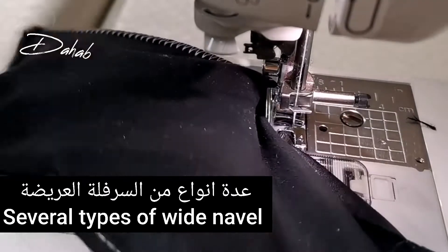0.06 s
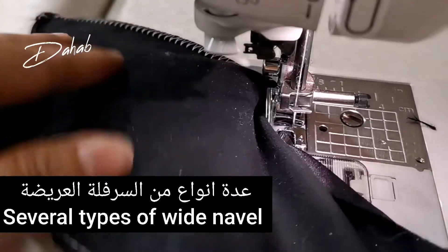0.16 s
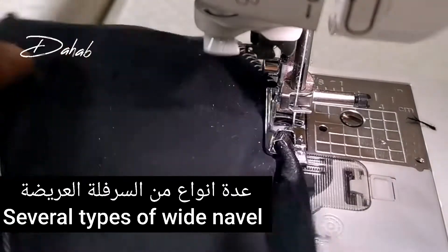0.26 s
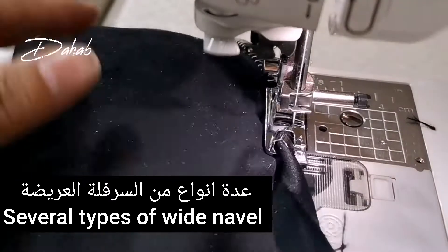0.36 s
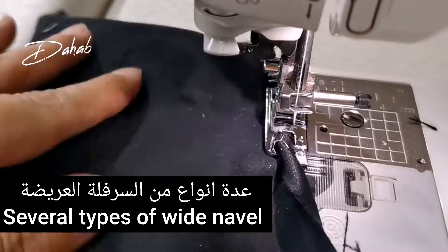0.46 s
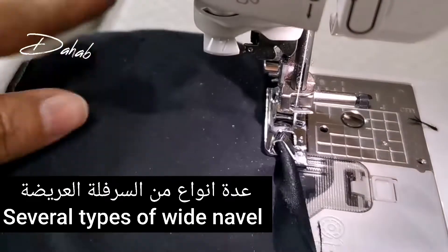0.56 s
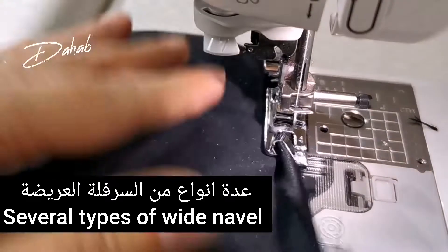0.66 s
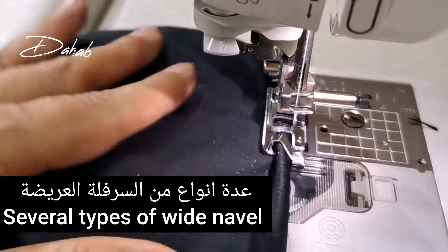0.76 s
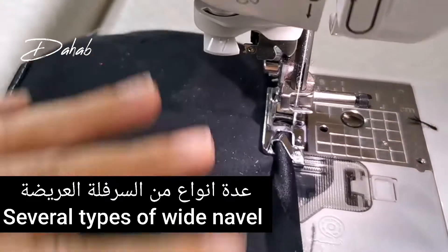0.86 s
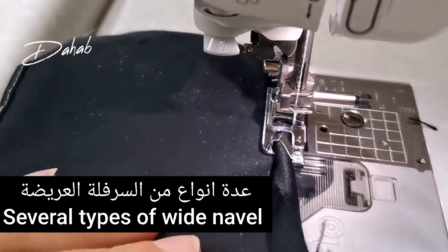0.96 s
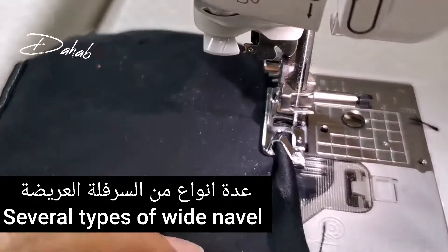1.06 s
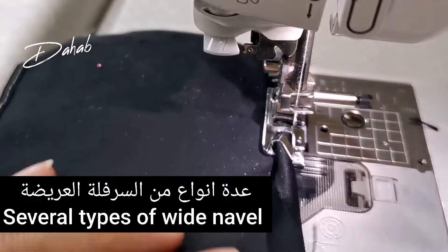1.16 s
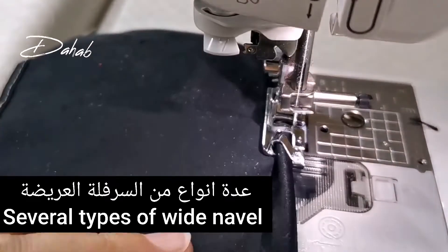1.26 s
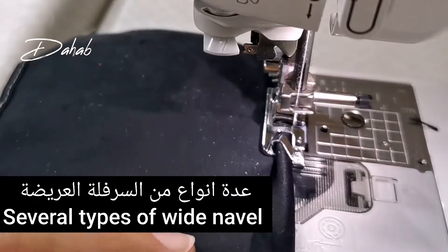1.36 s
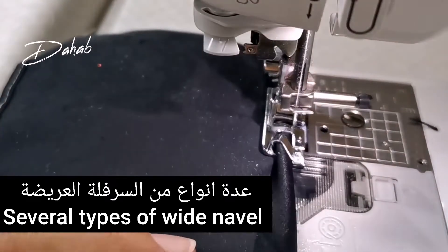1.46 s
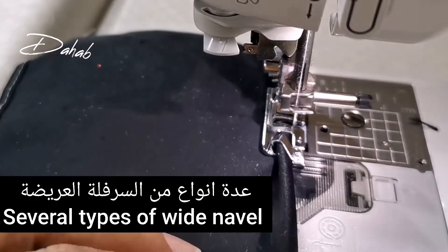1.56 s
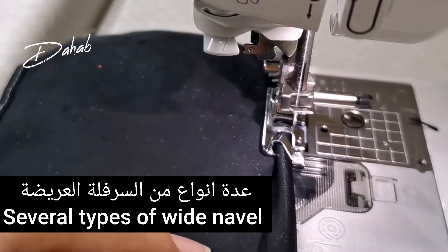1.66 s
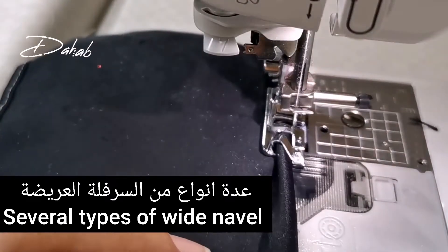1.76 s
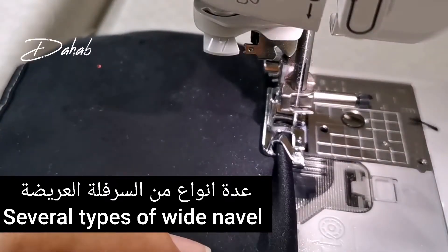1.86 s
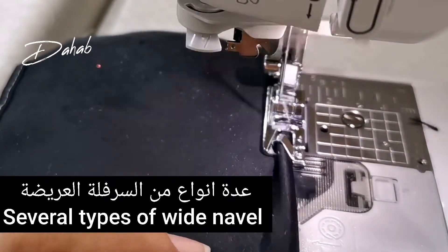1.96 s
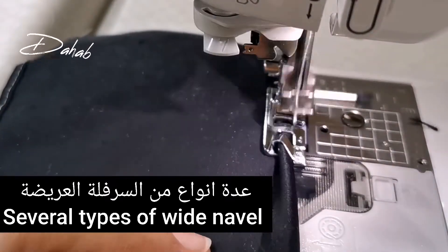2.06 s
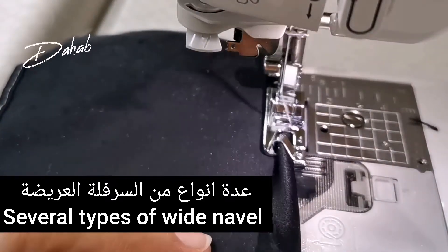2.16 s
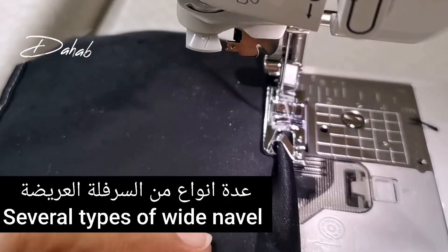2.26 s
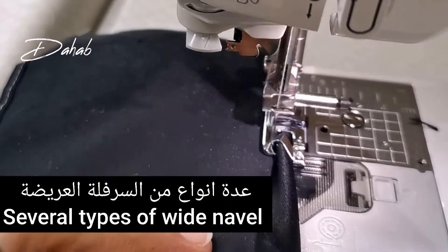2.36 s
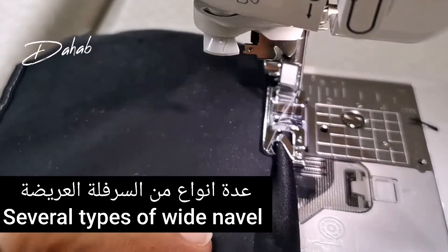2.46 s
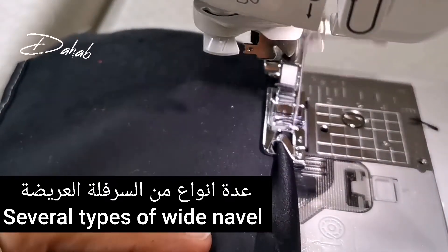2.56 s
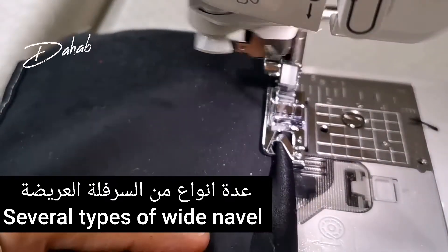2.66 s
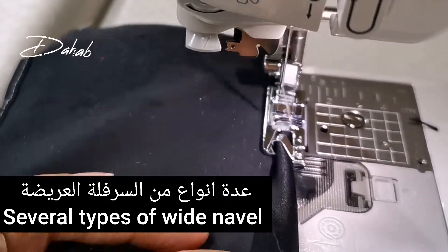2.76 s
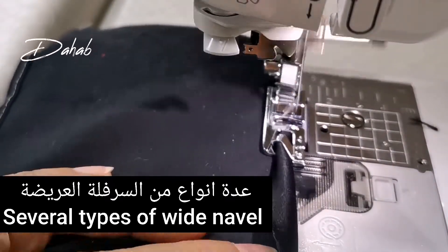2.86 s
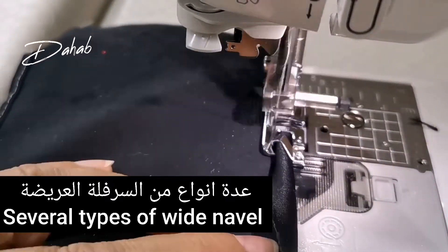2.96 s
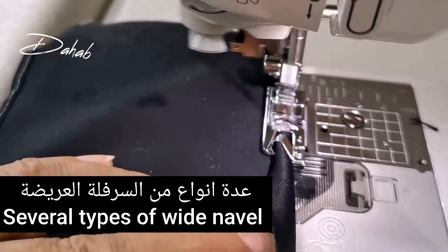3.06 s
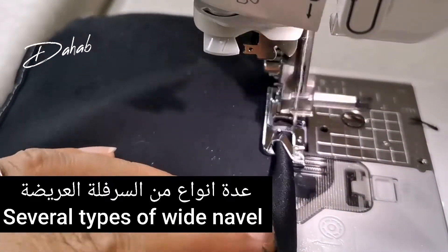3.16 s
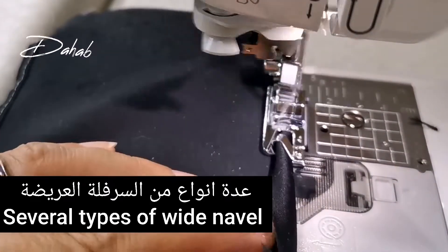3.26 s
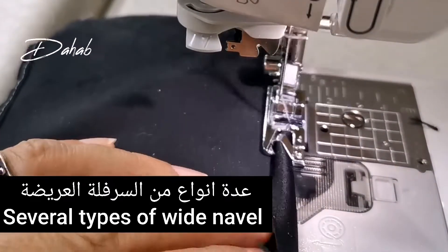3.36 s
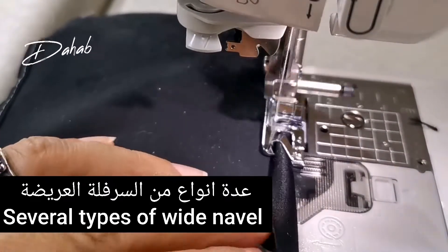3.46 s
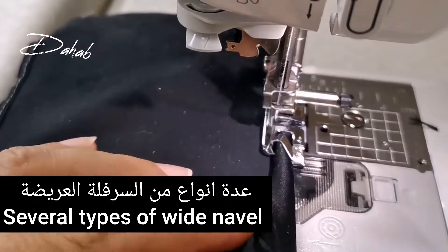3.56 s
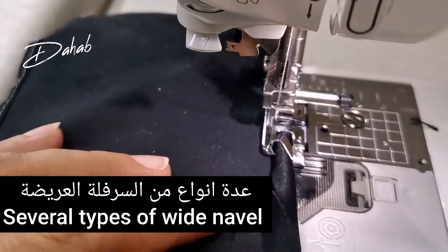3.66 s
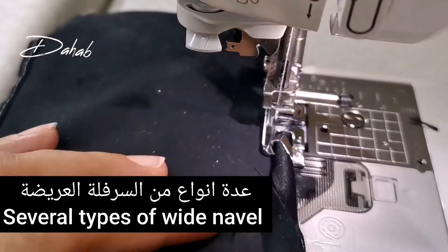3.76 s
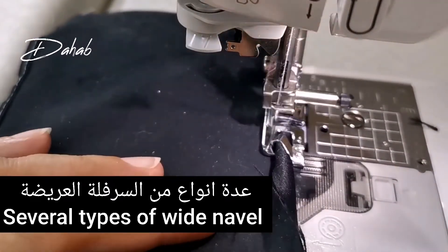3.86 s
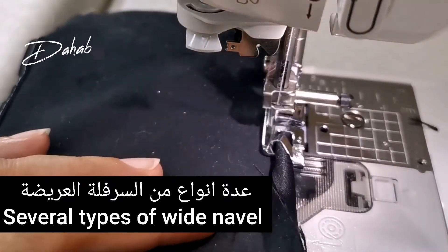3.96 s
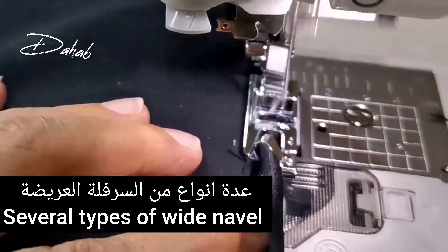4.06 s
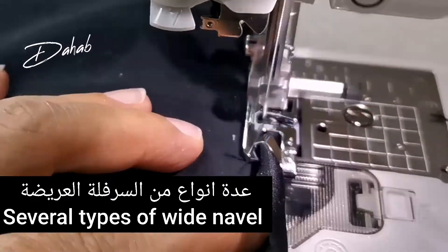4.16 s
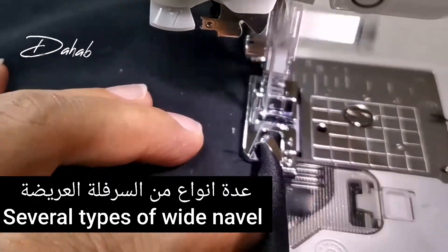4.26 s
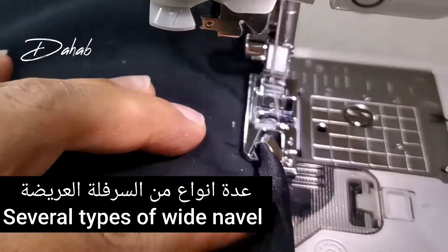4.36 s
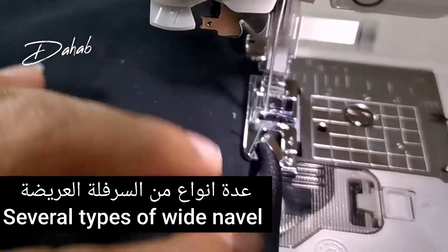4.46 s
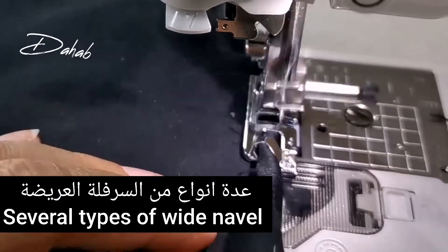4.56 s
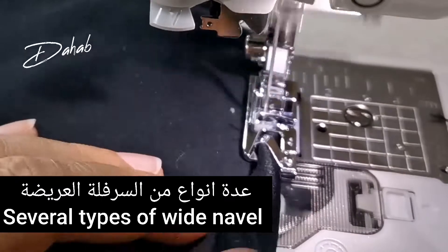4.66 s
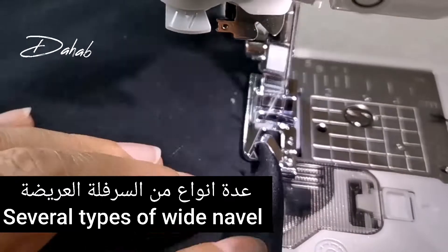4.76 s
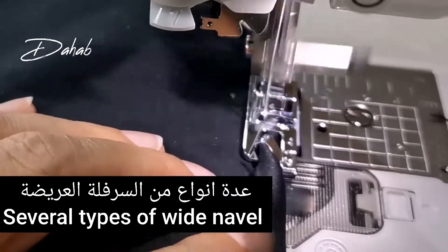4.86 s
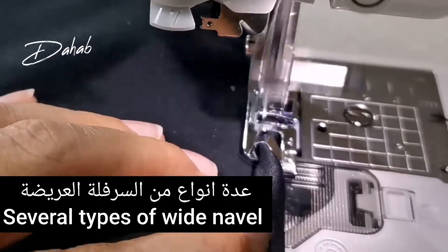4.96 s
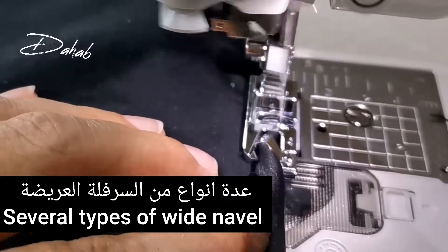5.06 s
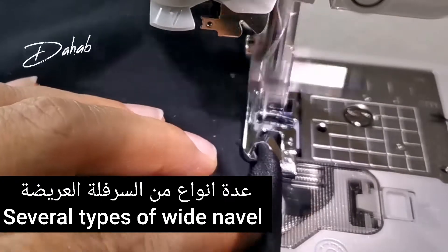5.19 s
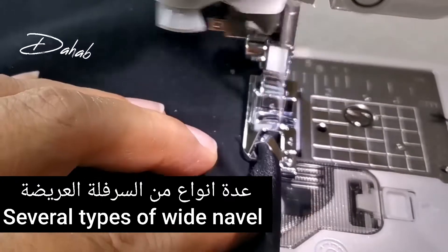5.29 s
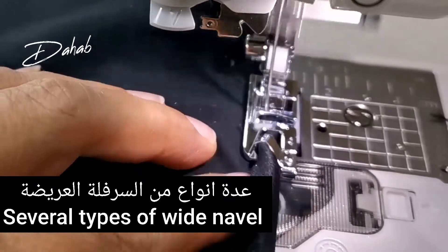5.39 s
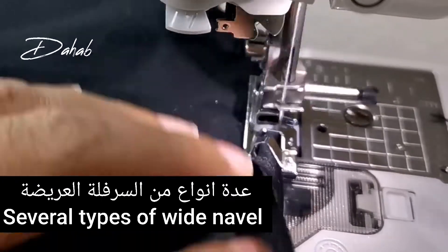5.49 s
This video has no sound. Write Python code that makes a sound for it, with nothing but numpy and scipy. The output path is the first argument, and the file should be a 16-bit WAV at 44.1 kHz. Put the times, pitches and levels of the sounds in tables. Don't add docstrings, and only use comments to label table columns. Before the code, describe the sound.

Cloth rustles and muffled fingertip thuds come first over faint room noise. An electric sewing machine then stutters into motion, its hollow casing knocking, metal links rattling and a belt whine climbing. It stops briefly, leaving near silence, and restarts at once at full speed with heavier table thumps and a constant mid-pitched hum, heard close in dry stereo.

```python
import sys
import numpy as np
from scipy import signal
from scipy.fft import rfft, irfft, next_fast_len
from scipy.io import wavfile
from scipy.ndimage import uniform_filter1d

SR = 44100
rng = np.random.default_rng(int(sys.argv[2]) if len(sys.argv) > 2 else 0)


def master_out(mix):
    frames = np.transpose(np.atleast_2d(mix))
    ceiling = np.clip(frames, -1, 1)
    pcm = np.round(ceiling * 32767).astype(np.int16)
    wavfile.write(sys.argv[1], SR, pcm)


def volts(x):
    e = np.asarray(x, float) / 20
    return 10 ** e


N = 243873
TIME = np.arange(N) / SR
BLOW_TIME = TIME[:SR // 6]
PADDED = next_fast_len(N)

# (frequency [Hz], density [dB per Hz])
ROOM_SPECTRUM = [(12, -36), (20, 2.5), (80, -10), (120, -14), (270, -12), (301, -19), (328, -9.5),
                 (388, -20), (558, -19.5), (1760, -25.5), (16000, -41)]
ROOM_DB = -65.5

# (time of top [s], rustle level [dB], time to rise 20 dB [s], time to fall 20 dB [s])
STROKES = [(.06, -62, .4, .2), (.33, -51.5, .1, .03), (.4, -70, .2, .08), (.5, -66, .05, .1),
           (.564, -52.5, .06, .19), (.754, -51.5, .03, .09), (.875, -65, .3, .06), (1.062, -63, .05, .04),
           (1.0, -69, .15, .4), (1.25, -66, .5, .12), (1.41, -68, .12, .3), (1.53, -65, .1, .12),
           (1.715, -65, .2, .025), (1.88, -64, .05, .08), (3.5, -71, .05, .2), (3.655, -64, .2, .12)]
# (frequency [Hz], density [dB per Hz])
RUSTLE_SPECTRUM = [(530, -21), (900, -9.5), (2250, -13.5), (2830, -7.5), (3470, -16.5), (4630, -6),
                   (6330, -14), (8150, -10), (13700, -19), (16000, -11.5)]
# (frequency [Hz], density [dB per Hz])
RUB_SPECTRUM = [(53, -41), (90, -15), (183, -7), (405, -16.5), (480, -17.5), (714, -15), (1600, -24),
                (2080, -38), (3520, -120)]
RESTING_RUSTLE_DB, RESTING_RUB_DB, RUB_OVER_RUSTLE_DB = -83, -67, -6

# (time [s], peak level [dB], long-ringing pitch [Hz], short pitch [Hz], crack level [dB])
TAPS = [(.098, -58, 340, 179, -14), (.238, -34.5, 382, 520, -25), (.512, -33.5, 290, 808, -25.5),
        (.7525, -27, 470, 745, -15), (.743, -52, 450, 900, -10), (1.05, -57, 146, 150, -24),
        (1.539, -53, 1130, 183, -20), (1.72, -57, 200, 990, -18), (1.981, -39, 438, 430, -24),
        (1.648, -70, 2100, 900, -8), (1.683, -70, 1900, 600, -10), (1.752, -62, 710, 720, -30),
        (1.864, -64, 700, 300, -14), (.555, -54, 420, 900, -16), (.29, -56, 400, 520, -20)]
SHORT_PARTIAL_DB = 3.5

# (time [s], peak level [dB])
SNAPS = [(0.1024, -54), (0.4529, -58), (0.7074, -53), (1.6929, -56), (1.8711, -55), (2.2578, -42),
         (3.1694, -39), (4.1474, -44), (4.1954, -35), (4.3794, -34), (4.8539, -30)]

# (frequency [Hz], width [Hz], level [dB])
SQUEAK_MODES = [(4900, 200, 0), (5500, 250, -8), (2700, 200, -10)]
SQUEAK_S, SQUEAK_LENGTH_S, SQUEAK_DB = 1.046, .03, -59

# (time [s], level [dB])
CREAK = [
    (1.188, -60),
    (1.197, -48),
    (1.215, -50),
    (1.25, -52),
    (1.26, -62),
]
# (frequency [Hz], width [Hz], level [dB])
CREAK_MODES = [(590, 146, -11), (720, 20, 2), (835, 24, -2), (1160, 30, -19), (2700, 80, -24),
               (335, 30, -17)]
POP_S, POP_DB, POP_HZ = 1.198, -37, 720

# (time [s], peak level [dB], level of ring near 7 kHz [dB])
TICKS = [(1.721, -51.5, -18), (1.9063, -40.5, -15), (1.9852, -30, -7.5), (2.2578, -43, -11),
         (2.322, -36, -13), (2.358, -32, -15), (2.363, -56, -7), (2.555, -32, -21), (2.616, -29, -3.5),
         (2.672, -29, -15), (2.73, -42, -11), (2.9604, -39, 3.5), (3.103, -26, -3), (3.4955, -52, -7),
         (3.933, -48.5, -30), (4.0696, -24.5, -17), (4.2284, -30, -27), (4.3106, -26.5, -27),
         (4.403, -28, -12.5), (4.7765, -30, -11), (4.8748, -27, -6), (5.1183, -27, -7), (5.3468, -26, -1),
         (5.486, -29, -9)]

# (time [s], level [dB])
EFFORT = [(1.978, -70), (1.995, -43), (2.11, -39), (2.17, -55), (2.22, -43), (2.28, -60), (2.34, -53),
          (2.45, -49.5), (2.7, -44), (3.2, -39.5), (3.4, -41), (3.47, -51), (3.62, -74), (3.7, -100),
          (4.022, -100), (4.035, -44), (4.6, -41), (5.53, -43)]
# (frequency [Hz], width [Hz], level [dB])
CASING_MODES = [(107, 58, -20.5), (186, 111, -8.5), (285, 82, -4.5), (460, 116, -5.5), (700, 123, -2.5),
                (770, 111.6, -0.5), (990, 110, -8), (1097, 402, -15.5)]
# (frequency [Hz], width [Hz], level [dB])
PLATE_MODES = [(1200, 830, -14.5), (1590, 105, -5), (2060, 490, -10), (2752, 130, 3), (2962, 355, -2),
               (3540, 110, -4.5), (3964, 155, -5.5), (4340, 180, -9), (4500, 85, -3), (4854, 287, -3),
               (5420, 390, -10)]
# (frequency [Hz], width [Hz], level [dB])
BAR_MODES = [(7256, 167, 2), (6910, 880, -6.5), (7750, 380, -4), (8460, 600, -6.5), (10600, 2100, -15),
             (13000, 1200, -13), (14560, 1100, -13.5)]
FULL_DB, HISS_DB, HISS_FOLLOWS = -41, -52, 1.1
STOP_S, RESTART_S, STOPPED_HISS_DB = 3.44, 4.0, -14

# (time [s], knock level [dB], knock pitch [Hz], rattle level [dB], rebound level [dB])
FIRST_SPELL = [(1.992, -50, 763, -50, -44), (2.034, -30.5, 693, -28, -55), (2.095, -28.5, 693, -31, -60),
               (2.205, -58, 740, -48, -62), (2.267, -58, 740, -44, -56), (2.318, -52, 732, -50, -56),
               (2.435, -50, 715, -50, -56), (2.523, -33, 694, -33, -46), (2.608, -47, 667, -45, -55),
               (2.646, -29, 695, -36, -37), (2.738, -28, 740, -30.5, -41), (2.821, -28.5, 743, -34, -36),
               (2.926, -29.5, 750, -30.5, -55), (2.994, -33, 690, -31, -43), (3.07, -30, 742, -28.5, -52),
               (3.1425, -29, 713, -29.5, -57), (3.2, -33, 780, -38, -36), (3.268, -29.5, 727, -37, -33),
               (3.337, -35, 764, -32, -52), (3.397, -26, 705, -37, -43), (3.462, -40, 700, -62, -70)]
# (time [s], knock level [dB], knock pitch [Hz], rattle level [dB], rebound level [dB])
SECOND_SPELL = [(4.04, -47, 654, -35.5, -40), (4.118, -53, 694, -40, -36), (4.201, -27.5, 745, -34.5, -40),
                (4.29, -47, 815, -33, -44), (4.365, -41, 737, -37, -37), (4.446, -35, 695, -34.5, -41),
                (4.525, -32.5, 778, -29.5, -50), (4.606, -35, 799, -32, -32), (4.685, -31, 770, -28, -50),
                (4.759, -40, 753, -31.5, -38), (4.831, -48, 685, -36.5, -40.5),
                (4.916, -28, 705, -29.5, -58), (5.0, -32, 700, -29.5, -50), (5.073, -35, 685, -33, -50),
                (5.153, -37, 770, -34, -42), (5.239, -34.5, 748, -33, -50), (5.308, -48, 804, -33, -58),
                (5.388, -24, 734, -31.5, -50), (5.463, -35, 770, -32.5, -37)]
RATTLE_LEAD_S, RATTLE_S, RATTLE_BRIGHT_DB = .0095, .0128, -5
REBOUND_SHARE, REBOUND_S, REBOUND_BRIGHT_DB = .22, .0095, -10
SHIVER_DB, SHIVER_LEAD_S, SHIVER_BRIGHT_DB = -22, .003, 4
REBOUND_KNOCK_DB = -3
# (time [s], peak level [dB], pitch [Hz])
ECHO_KNOCKS = [(2.104, -34, 760), (3.082, -31, 760), (3.213, -34, 800), (3.445, -45, 720),
               (4.918, -36, 980), (4.775, -36, 800), (4.862, -36, 800), (5.162, -38, 880),
               (5.388, -30, 700), (4.686, -33, 760)]

# (time [s], peak level [dB], pitch [Hz])
FIRST_CLINKS = [(2.0103, -38, 4970), (2.0318, -34, 2900), (2.0896, -34, 4800), (2.1829, -50, 2780),
                (2.2059, -45, 5500), (2.2453, -43, 3100), (2.2583, -42, 4490), (2.3131, -54, 2600),
                (2.3236, -44, 4830), (2.358, -40, 4600), (2.394, -55, 4940), (2.4379, -46, 2790),
                (2.4997, -38, 4990), (2.5197, -35, 4740), (2.5536, -39, 4910), (2.6095, -41, 4080),
                (2.6354, -37, 4930), (2.6504, -33, 4090), (2.6968, -41, 4730), (2.7274, -37, 4400),
                (2.7352, -31, 4900), (2.8165, -37, 2780), (2.837, -36, 4820), (2.9084, -43, 4700),
                (2.9173, -36, 4800), (2.9297, -34, 4820), (2.9911, -33, 3990), (3.0609, -33, 4480),
                (3.1048, -39, 3990), (3.1408, -31, 4850), (3.1896, -38, 4790), (3.2071, -35, 4740),
                (3.2615, -37, 4780), (3.2789, -34, 4820), (3.3253, -38, 4940), (3.3378, -34, 4750),
                (3.3937, -38, 5520), (3.4306, -44, 4820)]
# (time [s], peak level [dB], pitch [Hz])
SECOND_CLINKS = [(4.0372, -37, 3960), (4.0701, -35, 4630), (4.1096, -44, 2940), (4.1474, -40, 4410),
                 (4.1729, -43, 5770), (4.1949, -39, 2990), (4.2298, -37, 5010), (4.2802, -36, 4800),
                 (4.3116, -38, 5230), (4.3445, -42, 4740), (4.36, -36, 4840), (4.3844, -38, 2580),
                 (4.4388, -38, 4790), (4.4544, -36, 2780), (4.5151, -35, 4510), (4.5979, -35, 4570),
                 (4.6194, -35, 2590), (4.6633, -37, 5020), (4.6798, -32, 2780), (4.7491, -32, 2910),
                 (4.8294, -37, 4450), (4.8539, -34, 4620), (4.8748, -36, 4820), (4.9127, -35, 4240),
                 (4.9896, -35, 3980), (5.0044, -34, 4810), (5.0719, -32, 2900), (5.1153, -39, 4990),
                 (5.1494, -38, 4910), (5.232, -37, 2990), (5.3053, -31, 4520), (5.3477, -34, 4550),
                 (5.3817, -34, 4870), (5.4655, -32, 4900), (5.4849, -33, 5340)]
CLINK_WIDTH_SHARE = .07

# (time [s], peak level [dB], pitch [Hz])
THUMPS = [(2.085, -38, 328), (2.219, -39.5, 297), (2.515, -33, 260), (2.776, -34.5, 282), (2.909, -33, 248),
          (3.029, -38, 346), (3.078, -35, 259), (3.278, -39, 342), (3.352, -40, 240), (4.038, -35, 225),
          (4.082, -28, 293), (4.152, -30, 309), (4.237, -28.5, 214), (4.325, -27.5, 276), (4.391, -33, 308),
          (4.444, -30, 310), (4.476, -26.5, 269), (4.55, -31, 272), (4.603, -36, 276), (4.715, -25, 274),
          (4.794, -27.5, 272), (4.943, -26.5, 277), (5.016, -28, 269), (5.035, -31, 256), (5.157, -35, 280),
          (5.185, -27, 263.3), (5.259, -26, 285), (5.308, -33, 302), (5.41, -24.5, 278),
          (5.495, -27.5, 253)]

# (time [s], tooth rate [Hz], level [dB])
WHINE = [
    [(2.36, 285, -80), (2.39, 296, -56), (2.52, 318, -54)],
    [(2.90, 742, -57), (2.94, 781, -35.5), (2.99, 880, -39.5), (3.05, 950, -48), (3.12, 990, -46.5),
     (3.36, 1017, -48), (3.42, 1000, -58)],
    [(4.025, 836, -40), (4.2, 828.3, -39.5), (4.8, 830, -39.5), (5.1, 833, -40), (5.25, 852, -39),
     (5.4, 850, -39.5), (5.53, 864, -40.5)],
]

# (frequency [Hz], share unlike [0 to 1])
UNLIKE = [(40, .6), (75, .45), (130, .1), (700, .1), (1400, .75), (3000, .7), (6000, .42), (14000, .55)]
# (frequency [Hz], left minus right [dB])
TILT = [(60, 0.0), (110, 0.0), (200, 1.5), (380, 0.0), (700, 1.5), (1290, -2.5), (2380, 0.5), (4400, -1.5),
        (8120, -3.5), (15000, 4.5)]
# (frequency [Hz], lead of the left [rad])
LEAD = [(150, .15), (830, 1.0), (1640, 2.2), (3000, 3.3), (4480, 4.9), (7000, 5.7)]
CUTOFF_HZ, LAST_HZ = 15900, 16600


def rms_one(x):
    return x / np.sqrt(np.mean(x ** 2) + 1e-20)


def noise(length=N):
    return rng.standard_normal((2, length))


def level(tables, column, fade_db=-140):
    gain = 0
    for rows in tables:
        points = np.array(rows)
        gain = gain + volts(np.interp(TIME, points[:, 0], points[:, column], fade_db, fade_db))
    return gain


def at_hz(points, hz):
    points = np.array(points)
    return np.interp(np.log(hz + 1), np.log(points[:, 0]), points[:, 1])


def coloured(spectrum):
    hz = np.fft.rfftfreq(PADDED, 1 / SR)
    shaped = rfft(noise(PADDED)) * volts(at_hz(spectrum, hz))
    return rms_one(irfft(shaped, PADDED)[:, :N])


def flicker(rate, depth_db):
    knots = rng.standard_normal(N // 128)
    return volts(depth_db * np.interp(TIME * rate, np.arange(len(knots)), knots))


def resonate(x, modes, patchy_db=0):
    out = 0
    for k, (hz, width, db) in enumerate(modes):
        r = np.exp(-np.pi * width / SR)
        b = (1 - r * r) / 2 * np.array([1, 0, -1])
        a = [1, -2 * r * np.cos(2 * np.pi * hz / SR), r * r]
        shaken = x * flicker(90, patchy_db)[:x.shape[-1]] + 1e-18
        out = out + (-1) ** k * volts(db) * signal.lfilter(b, a, shaken)
    return out


def add(out, s, sound):
    i = round(s * SR)
    out[:, i:i + sound.shape[-1]] += sound[..., :N - i]


def swell(rise, t60):
    shape = (1 - np.exp(-BLOW_TIME / rise)) ** 2 * volts(-60 * BLOW_TIME / t60)
    return shape / shape.max()


def blow(hz, rise, t60, partials):
    luck = rng.standard_normal((len(partials), 2, 2, 1))
    out = 0
    for (ratio, db), (a, b) in zip(partials, luck):
        tone = np.sin(2 * np.pi * hz * ratio * BLOW_TIME + 2 * b)
        out = out + volts(db + 1.02 * a) * tone * swell(rise, t60)
    return out


def room_tone():
    return volts(ROOM_DB - 1) * coloured(ROOM_SPECTRUM)


def strokes():
    gains_db = [db - 20 * np.maximum((s - TIME) / rise, (TIME - s) / fall) for s, db, rise, fall in STROKES]
    return volts(np.max(gains_db, axis=0))


def cloth():
    sliding = strokes()
    rustle = (sliding + volts(RESTING_RUSTLE_DB)) * volts(1.5) * coloured(RUSTLE_SPECTRUM) * flicker(55, 2.6)
    rub_gain = sliding * volts(RUB_OVER_RUSTLE_DB) + volts(RESTING_RUB_DB)
    return rustle + rub_gain * volts(-6) * coloured(RUB_SPECTRUM) * flicker(20, 2.5)


def taps():
    out = np.zeros((2, N))
    murmur = rms_one(resonate(noise(), CASING_MODES))
    dull = signal.butter(2, 3500, "low", fs=SR, output="sos")
    for s, db, low_hz, high_hz, crack_db in TAPS:
        thud = blow(low_hz, .0012, .06, [(1, 0)])
        thud = thud + volts(SHORT_PARTIAL_DB) * blow(high_hz, .00093, .027, [(1, -.5), (1.3, -9), (1.75, -15)])
        crack = signal.sosfilt(dull, noise(len(BLOW_TIME))) * swell(.0012, .035)
        after = murmur[:, round(s * SR):][:, :len(BLOW_TIME)] * swell(.001, .26)
        add(out, s, volts(db) * (thud + volts(crack_db + 17.5) * crack + volts(-17) * after))
    return out


def snaps():
    out = np.zeros((2, N))
    bright = signal.butter(2, 5500, "high", fs=SR, output="sos")
    for s, db in SNAPS:
        click = signal.sosfilt(bright, noise(len(BLOW_TIME))) * swell(.0002, .006)
        add(out, s, volts(db - 7) * click)
    return out


def squeak():
    since, left = TIME - SQUEAK_S, SQUEAK_S + SQUEAK_LENGTH_S - TIME
    drag = np.clip(np.minimum(since, left) / .005, 0, 1)
    return volts(SQUEAK_DB) * drag * rms_one(resonate(noise(), SQUEAK_MODES))


def creak():
    out = level([CREAK], column=1) * rms_one(resonate(noise(), CREAK_MODES))
    add(out, POP_S, volts(POP_DB) * blow(POP_HZ, .002, .07, [(1, 0), (1.16, -10), (.8, -14)]))
    return out


def ticks():
    out = np.zeros((2, N))
    bright = signal.butter(2, 4500, "high", fs=SR, output="sos")
    for s, db, ring_db in TICKS:
        snap = signal.sosfilt(bright, noise(len(BLOW_TIME))) * swell(.0003, .011) * volts(2.5)
        ring = blow(7200, .00033, .017, [(1, -3.5), (1.1, -7)])
        add(out, s, volts(db - 10) * (snap + volts(ring_db + 12.5) * ring))
    return out


def stitch_rows():
    rows = []
    for spell in (FIRST_SPELL, SECOND_SPELL):
        s = np.array(spell)[:, 0]
        stitch = np.append(np.diff(s), np.diff(s)[-1])
        rows += [(*row, again) for row, again in zip(spell, s + REBOUND_SHARE * stitch)]
    return rows


def rattles():
    rows = [(s - SHIVER_LEAD_S, db + SHIVER_DB, REBOUND_S, SHIVER_BRIGHT_DB) for s, db, _ in TICKS]
    for s, _, _, db, again_db, again in stitch_rows():
        rows.append((s - RATTLE_LEAD_S, db, RATTLE_S, RATTLE_BRIGHT_DB))
        rows.append((again, again_db, REBOUND_S, REBOUND_BRIGHT_DB))
    return rows


def running_gear():
    effort = level([EFFORT], column=1)
    shaking = volts(HISS_DB) * (effort / volts(FULL_DB)) ** HISS_FOLLOWS * volts([[0], [-2]])
    shaking[:, (TIME > STOP_S) & (TIME < RESTART_S)] *= volts(STOPPED_HISS_DB)
    for s, db, length, bright_db in rattles():
        hump = BLOW_TIME / length * np.exp(-(BLOW_TIME / length) ** 1.54)
        add(shaking, s - .003, volts(db - 2.5) * hump * volts([[0], [bright_db + 1.5]]))
    grit = noise() * volts(3.0 * np.minimum(rng.exponential(1, N), 6))
    grit *= flicker(220, 3.0)
    plate = resonate(grit * shaking[0], PLATE_MODES, patchy_db=3.0)
    bar = resonate(grit * shaking[1], BAR_MODES, patchy_db=3.5)
    rumble = rms_one(resonate(noise(), CASING_MODES, patchy_db=3.0))
    return effort * rumble + volts(5.5) * plate + volts(7) * bar


def knocks():
    out = np.zeros((2, N))
    rows = stitch_rows()
    first = [row[:3] for row in rows]
    rebounds = [(again, db + REBOUND_KNOCK_DB, hz) for _, _, hz, _, db, again in rows]
    partials = [(1, 1.5), (1.1, -3), (.68, -13.5), (1.36, -15), (1.6, -19)]
    for s, db, hz in first + rebounds + ECHO_KNOCKS:
        add(out, s - .0035, volts(db - 1.5) * blow(hz, .0035, .05, partials))
    return out


def clinks():
    out = np.zeros((2, N))
    for s, db, hz in FIRST_CLINKS + SECOND_CLINKS:
        b, a = signal.iirpeak(hz, 1 / CLINK_WIDTH_SHARE, SR)
        chatter = rms_one(signal.lfilter(b, a, noise(len(BLOW_TIME))))
        add(out, s - .001, volts(db - 11) * chatter * swell(.002, .05))
    return out


def thumps():
    out = np.zeros((2, N))
    for s, db, hz in THUMPS:
        add(out, s - .002, volts(db - 8) * blow(hz, .006, .075, [(.997, .5), (.7, -4), (1.6, -11.5), (.45, -17)]))
    return out


def whine():
    out = 0
    for rows in WHINE:
        s, hz, _ = np.transpose(rows)
        phase = 2 * np.pi * np.cumsum(np.interp(TIME, s, hz) * flicker(25, .03)) / SR
        out = out + level([rows], column=2) * np.sqrt(2) * np.sin(phase)
    return out * flicker(40, 1.6) * [[1], [.3]]


def scene():
    hand_sounds = cloth() + taps() + snaps() + squeak() + creak()
    machine = ticks() + running_gear() + knocks() + clinks() + thumps() + whine()
    shared, other = rfft(room_tone() + hand_sounds + machine, PADDED)
    hz = np.fft.rfftfreq(PADDED, 1 / SR)
    unlike = np.clip(at_hz(UNLIKE, hz), 0, 1)
    shared, other = shared * np.sqrt(1 - unlike / 2), other * np.sqrt(unlike / 2)
    tilt = volts(at_hz(TILT, hz) / 2)
    lag = np.exp(.5j * at_hz(LEAD, hz))
    left, right = (shared + other) * tilt * lag, (shared - other) / tilt / lag
    return irfft([left, right], PADDED)[:, :N] * volts(1.5)


def top_cut(x):
    return signal.sosfilt(signal.butter(12, 16650, fs=SR, output="sos"), x)


def record(dry):
    low_pass = signal.cheby2(24, 50, CUTOFF_HZ, fs=SR, output="sos")
    shelf_band = signal.cheby2(12, 40, [CUTOFF_HZ - 250, LAST_HZ], "band", fs=SR, output="sos")
    body = signal.sosfilt(low_pass, dry)
    shelf = signal.sosfilt(shelf_band, dry)
    sharp = uniform_filter1d(shelf ** 2, size=128) / (uniform_filter1d(shelf ** 2, size=2048) + 1e-20)
    mix = body + volts(-18) * shelf * np.clip(sharp / 2.5 - 1, 0, 1)
    return top_cut(mix)


dry = scene()
out = record(dry)
master_out(out)
```